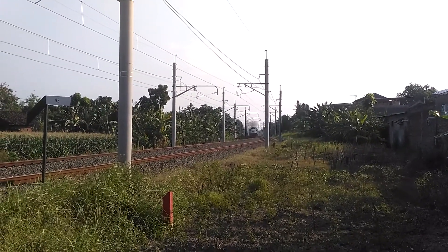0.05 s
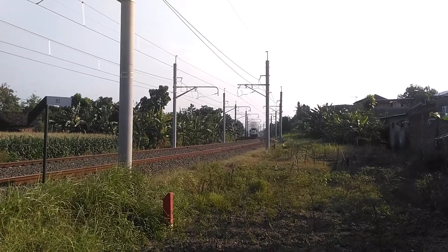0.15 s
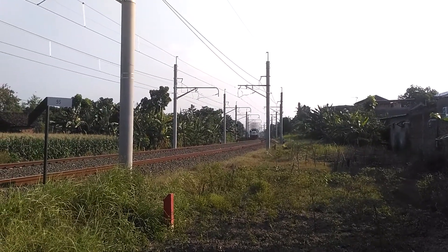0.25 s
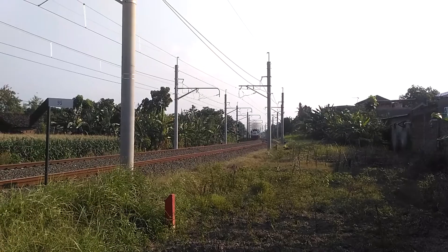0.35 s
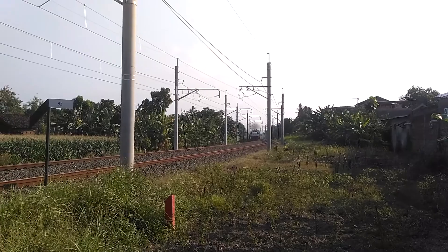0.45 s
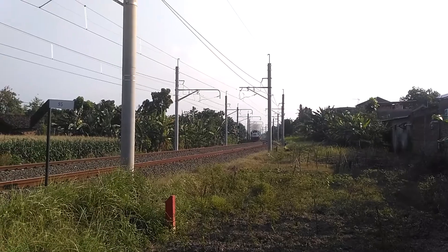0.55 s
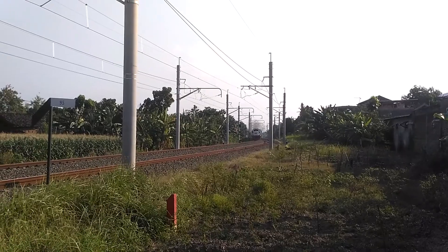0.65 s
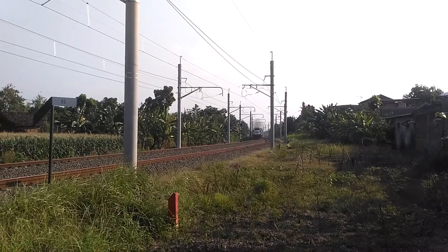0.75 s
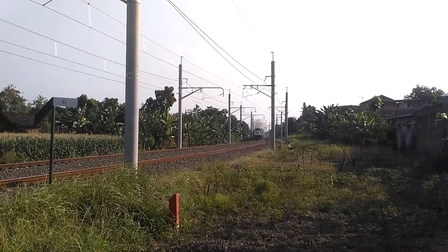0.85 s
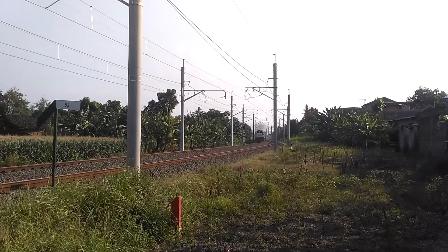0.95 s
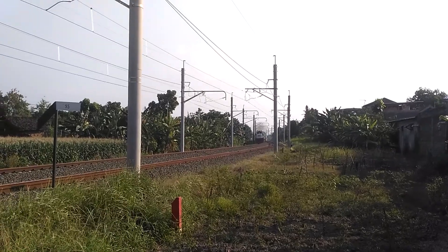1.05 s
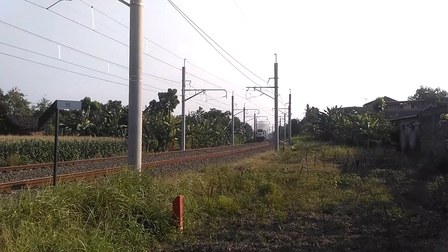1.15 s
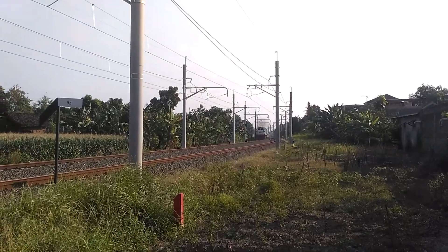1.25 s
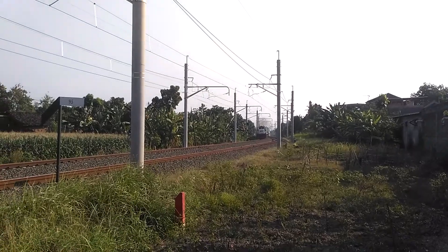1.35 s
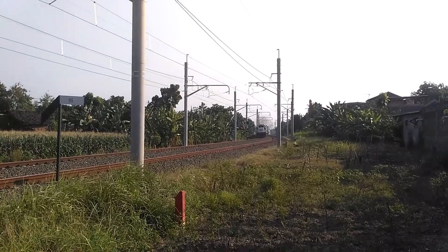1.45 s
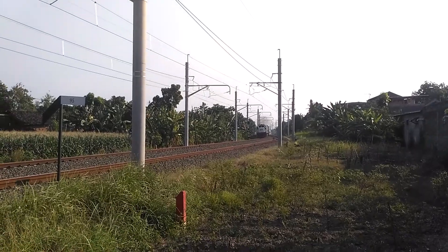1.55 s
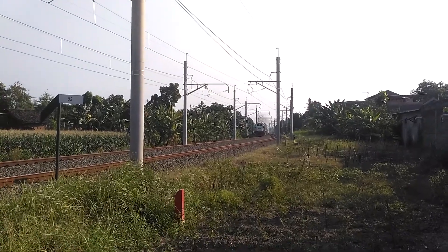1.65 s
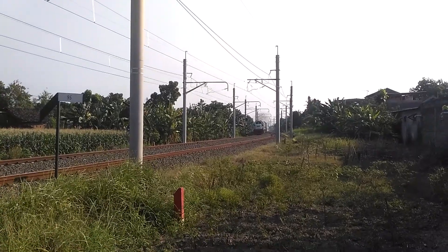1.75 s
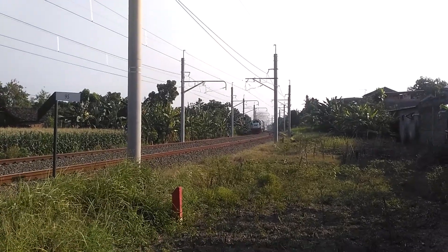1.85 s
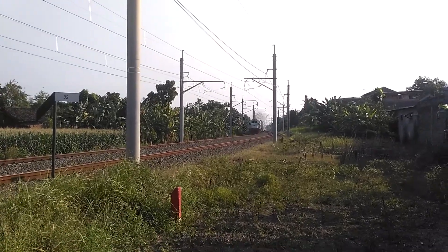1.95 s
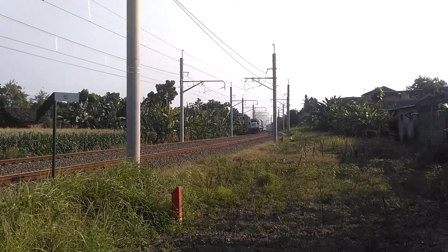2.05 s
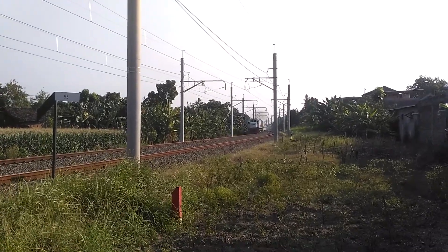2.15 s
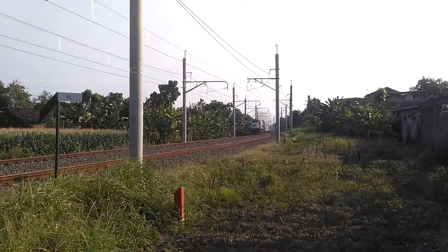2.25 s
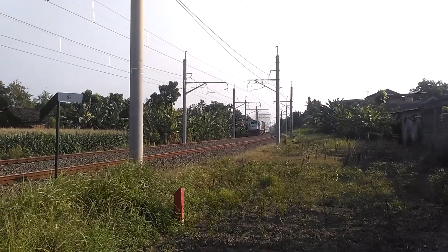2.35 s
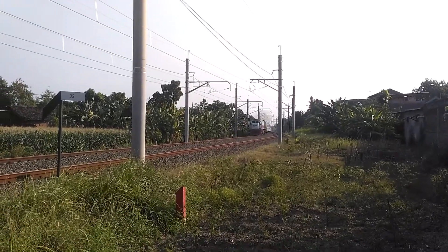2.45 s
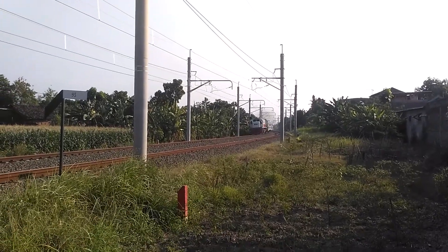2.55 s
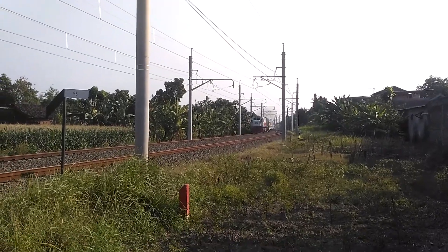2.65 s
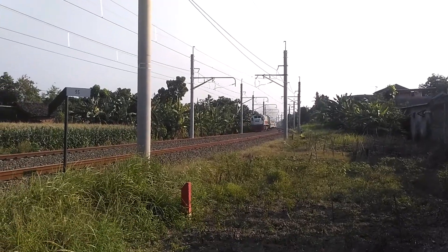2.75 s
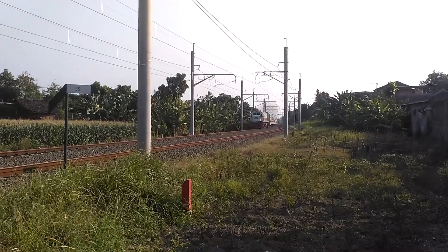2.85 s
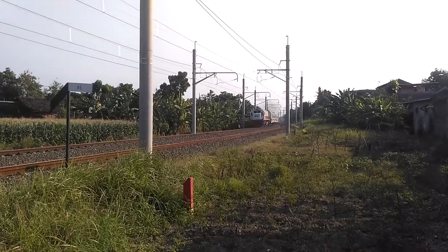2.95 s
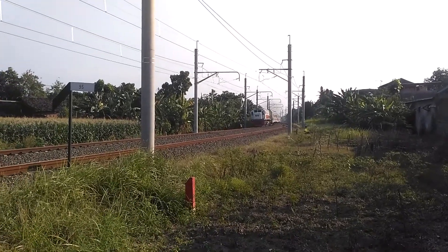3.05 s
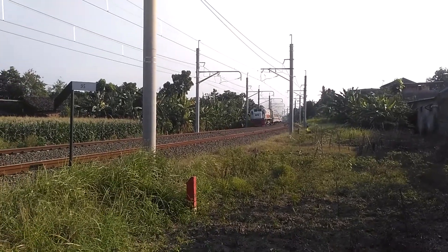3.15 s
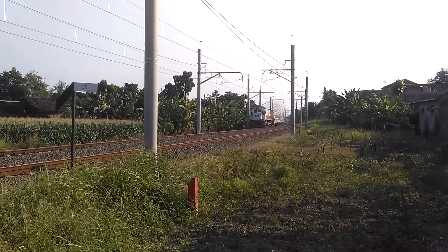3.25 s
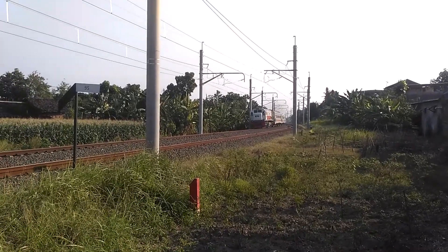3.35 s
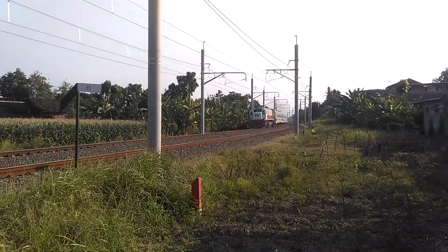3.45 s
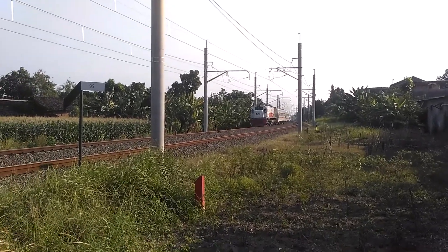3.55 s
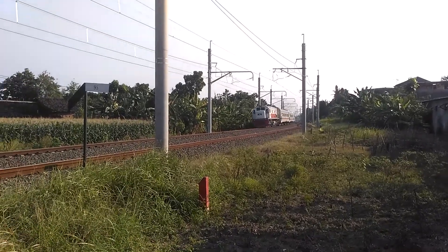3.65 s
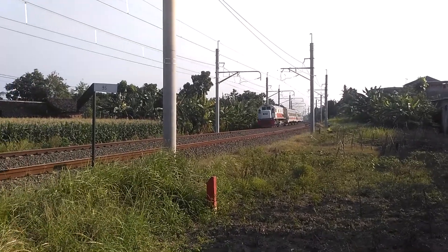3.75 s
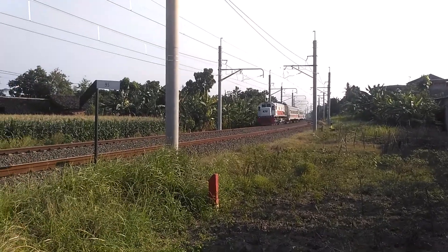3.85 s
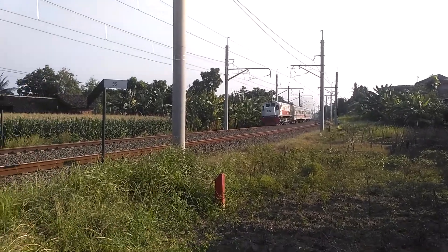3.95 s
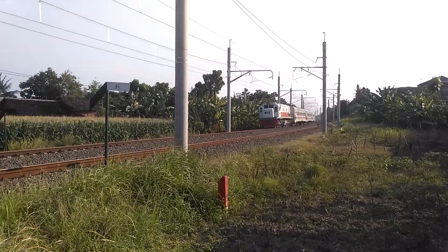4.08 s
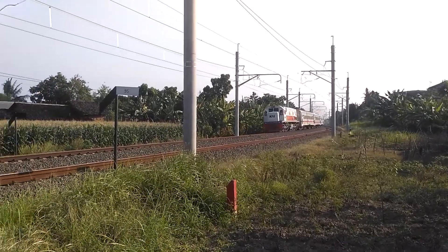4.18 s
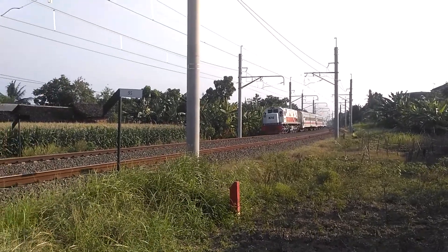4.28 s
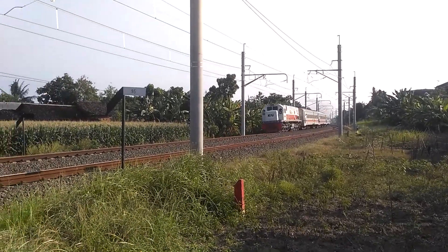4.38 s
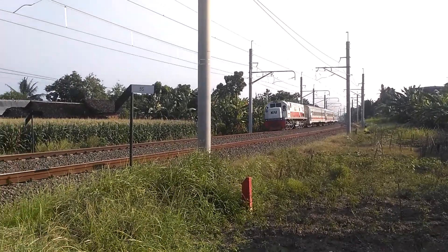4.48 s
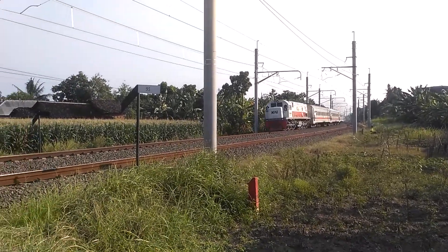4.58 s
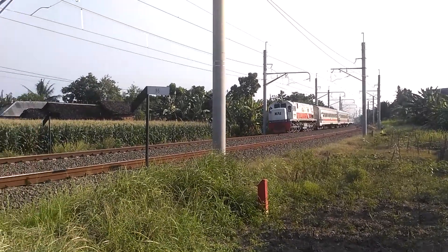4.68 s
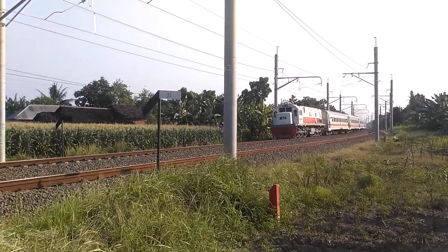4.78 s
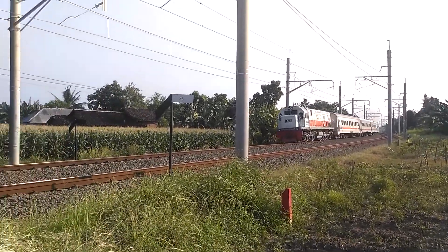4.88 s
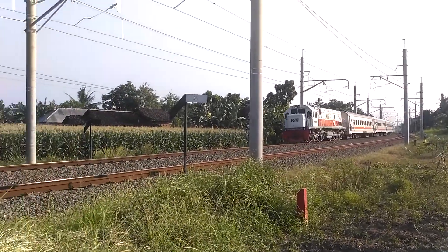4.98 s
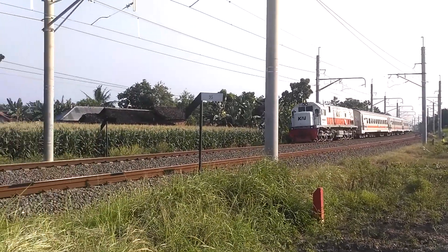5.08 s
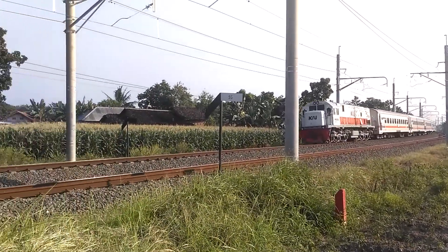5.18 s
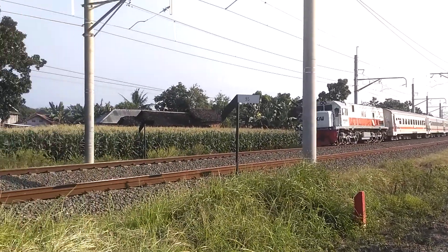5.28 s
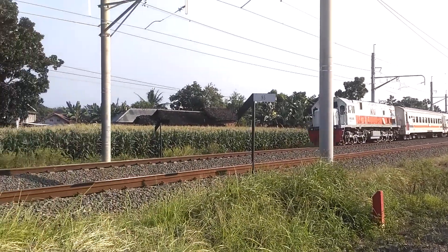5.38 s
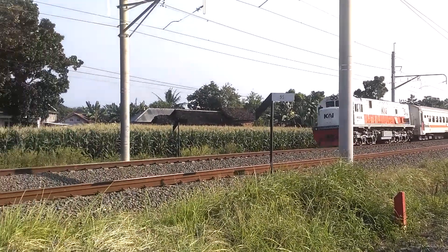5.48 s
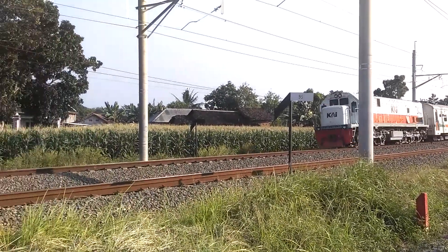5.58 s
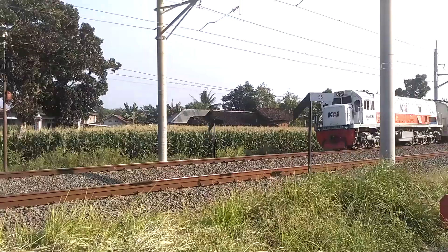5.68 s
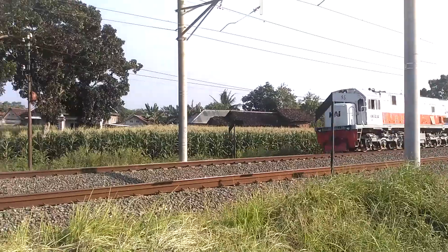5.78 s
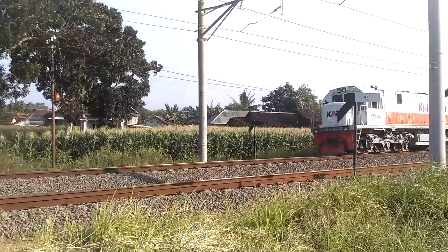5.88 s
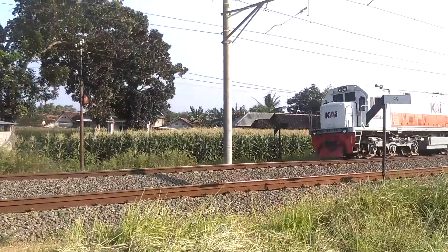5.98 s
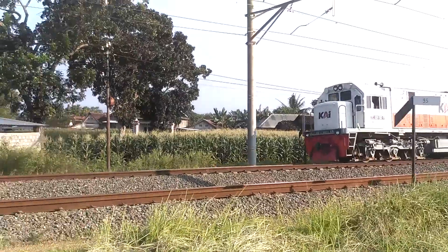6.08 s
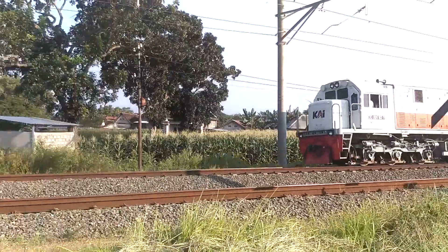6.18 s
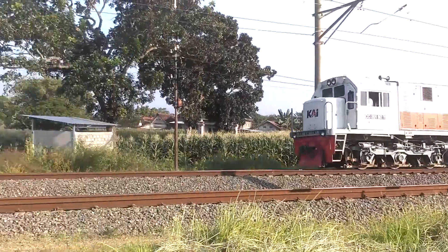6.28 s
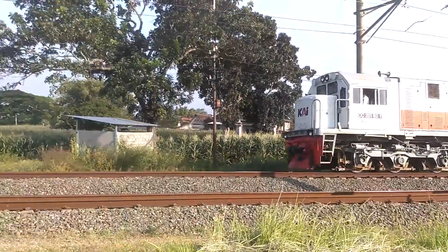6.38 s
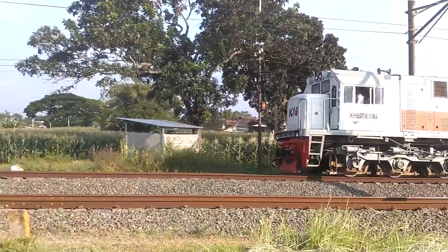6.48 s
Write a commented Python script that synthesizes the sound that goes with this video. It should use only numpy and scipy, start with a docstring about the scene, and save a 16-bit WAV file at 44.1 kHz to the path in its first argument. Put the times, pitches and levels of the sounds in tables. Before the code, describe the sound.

A diesel locomotive rumbles nearer along an open railway line, gives one long brassy horn blast, then throbs heavily with whining wheels as it draws close.

```python
"""Diesel locomotive with a horn blast

A diesel locomotive approaches through fields: a comb of exhaust orders throbs over banded rolling noise.
Close by, one harmonic horn blast sinks in pitch by the Doppler effect, with an echo from beside the track.
Early on, puffs of wind thump the left microphone port over a low breeze and knocks run ahead along the
rails; a wheel whine grows and is loudest shortly before the engine draws level.
An automatic gain control turns the level down under the horn."""
import sys
import numpy as np
from scipy import signal
from scipy.fft import rfft, irfft, next_fast_len
from scipy.io import wavfile
from scipy.ndimage import uniform_filter1d, map_coordinates

SR = 44100
rng = np.random.default_rng(int(sys.argv[2]) if len(sys.argv) > 2 else 0)


def digitize_waveform(pressure):
    """Quantize a signal to 16-bit integers and store it at the path in sys.argv[1].

    Rows of a 2-D input are taken as channels; values are limited to [-1, 1].
    """
    field = np.atleast_2d(pressure).T
    bounded = np.clip(field, -1, 1)
    quanta = np.round(bounded * 32767).astype(np.int16)
    wavfile.write(sys.argv[1], SR, quanta)


N = 287928
TIME = np.arange(N) / SR
LEFT_RIGHT = np.array([[1], [-1]])  # opposite signs for the two ports
HORN_ON_S, HORN_OFF_S = 4.712, 6.13
# horn partials 1 to 7, then all the treble: (nominal level at full blast [dB], trend [dB/s],
# release start [s], release rate [dB/s])
HORN_PARTIALS = [(-16, -0.5, 5.94, 171), (-6, -7, 5.705, 100.5), (-5, -8, 5.53, 61),
                 (-17.5, -19, 5.86, 101), (-16, -9.5, 5.77, 165.5), (-15, -6.5, 5.62, 86),
                 (-18.5, -12.5, 5.61, 78), (-16, -3, 5.573, 65)]


def from_db(db):
    """Amplitude gain from decibels, by the logarithmic law of level."""
    return 10 ** (np.asarray(db) / 20)


def rms_one(x):
    """Normalise the mean power, giving unit rms."""
    return x / np.sqrt(np.mean(x ** 2) + 1e-20)


def in_time(rows):
    """Linear interpolation of each column of a time curve at every sample."""
    s, *columns = np.transpose(rows)
    return [np.interp(TIME, s, c) for c in columns]


def at_hz(points, hz):
    """Linear interpolation of a spectrum on a log-frequency axis."""
    corner_hz, values = np.array(points).T
    return np.interp(np.log(hz), np.log(corner_hz), values)


def bumps(rows):
    """Gaussian level changes in dB, from rows of (time [s], half length [s], change [dB])."""
    return sum(db * np.exp(-((TIME - s) / half_s) ** 2) for s, half_s, db in rows)


def drift(rate_hz):
    """Random modulation: noise through a double-pole low-pass at a given rate, with spread about 1."""
    step = 40  # samples between the drawn points
    pole = np.exp(-2 * np.pi * rate_hz * step / SR)
    white = rng.standard_normal(N // step + 2002)
    slow = signal.lfilter([1], [1, -2 * pole, pole * pole], white)[2000:]
    return np.interp(np.arange(N) / step, np.arange(len(slow)), rms_one(slow))


def band(x, low_hz, high_hz, order=2):
    """Butterworth band-pass, maximally flat between its edges."""
    sos = signal.butter(order, [low_hz, high_hz], "band", fs=SR, output="sos")
    return signal.sosfilt(sos, x + 1e-18)


def diffuse(spectrum, low_hz, high_hz):
    """Diffuse-field noise: random phases, frequency-dependent port correlation; its middle has rms 1."""
    # correlation between the ports: (frequency [Hz], correlation coefficient)
    likeness = [(50, .6), (130, .9), (300, .7), (620, .62), (1300, .2), (2500, .05), (9000, 0)]
    size = next_fast_len(N, True)
    hz = np.fft.rfftfreq(size, 1 / SR)
    inside = (hz >= low_hz) & (hz < high_hz)
    mid, side = np.exp(2j * np.pi * rng.random((2, inside.sum())))
    alike = np.clip(at_hz(likeness, hz[inside]), -.9, 1)
    pair = np.sqrt(1 + alike) * mid + np.sqrt(1 - alike) * side * LEFT_RIGHT
    bins = np.zeros((2, len(hz)), complex)
    bins[:, inside] = from_db(at_hz(spectrum, hz[inside])) * pair
    x = irfft(bins, size)[:, :N]
    return x / x.mean(axis=0).std()


def breeze():
    """Turbulent pressure: lumpy low-frequency noise of moving air, slightly stronger on the left port."""
    # breeze level: (time [s], level [dB])
    breeze_curve = [(0, -51), (1.1, -48), (1.35, -56), (1.7, -50), (1.82, -42), (2.0, -53), (2.7, -58),
                    (4.2, -66), (5.0, -61)]
    rumble = rms_one(band(rng.standard_normal((2, N)), 55, 115)) * from_db(1.7 * drift(3))
    right_db = -1.5
    return rumble * from_db(in_time(breeze_curve)[0] + np.array([[0], [right_db]]))


def wind():
    """Eddy impact: each puff thumps the left port as a damped sinusoid and leaves a short noise flutter."""
    # wind puffs: (time [s], level before the common trim [dB], thump pitch [Hz])
    puffs = [(0.151, -31, 313), (0.169, -25, 173), (0.206, -30.5, 229), (0.263, -28.5, 234),
             (0.296, -26.5, 231), (0.503, -30.5, 202), (0.558, -28.5, 232), (0.633, -25.5, 222),
             (0.651, -28.5, 214), (0.922, -26.5, 184), (0.985, -33.5, 167), (1.171, -31, 347),
             (1.294, -32.5, 170), (1.454, -32, 181), (1.504, -30.5, 245), (1.531, -32, 172),
             (1.572, -27.5, 230), (1.587, -29, 172), (1.63, -23.5, 187), (1.673, -23, 186), (1.7, -28, 172),
             (1.766, -24.5, 168), (1.832, -26.5, 178), (2.26, -31.5, 310), (3.597, -28, 447)]
    trim_db, right_db = -4.5, -24
    rise_s, decay_s = 0.0024, 0.022
    push = np.zeros(N)
    age = np.arange(SR // 8) / SR
    for s, db, hz in puffs:
        thump = age / rise_s * np.exp(1 - age / rise_s) * np.sin(2 * np.pi * hz * age)
        envelope = np.exp(-age / decay_s) * (1 - np.exp(-age / rise_s))
        flutter = rms_one(band(rng.standard_normal(len(age)), 110, 400)) * envelope
        at = int(s * SR)
        push[at:at + len(age)] += from_db(db + trim_db) * (3.14 * thump + flutter)
    return push * from_db([[0], [right_db]])


def rail_knocks():
    """Structure-borne sound: hard wheel blows run far ahead in the rails as bursts in three resonances."""
    # resonances of the rail: (centre [Hz], width [Hz])
    rail_modes = [(1100, 160), (2350, 540), (4900, 700)]
    # wheel blows: (time [s], level in the first, second and third resonance [dB])
    knocks = [(.066, -41.5, -59, -42), (.093, -44, -58, -47), (.123, -45, -75, -50),
              (.183, -41.5, -61, -50), (.213, -41, -42, -49), (.243, -53, -43, -47.5),
              (.271, -44, -46, -46.5), (.301, -44, -43, -47), (.358, -43, -46, -62), (.381, -45, -62, -65),
              (.422, -45, -53, -52), (.449, -53, -38, -51), (.480, -57, -34, -54), (0.536, -57, -40, -71),
              (.595, -47, -36.5, -59), (0.655, -63, -41.5, -66), (0.707, -57, -41, -68)]
    half_s = .005
    out = 0
    for column, (hz, width_hz) in enumerate(rail_modes, 1):
        bursts = sum(from_db(row[column]) * np.exp(-((TIME - row[0]) / half_s) ** 2) for row in knocks)
        noise = band(rng.standard_normal((2, N)), hz - width_hz / 2, hz + width_hz / 2, order=3)
        out = out + bursts * rms_one(noise)
    return out


def sleeper_bursts():
    """Periodic excitation: one burst per sleeper the wheels cross, every other one stronger; rms 1."""
    crossing_hz, crossing_s = 34.02, .063
    sleeper = 2 * np.pi * crossing_hz * (TIME - crossing_s)
    return rms_one(np.exp(1.2 * np.cos(sleeper)) * (1 + .25 * np.cos(sleeper / 2)))


def wheel_ring():
    """Modal resonance: rolling contact keeps one wheel mode ringing, a whine pulsing with the sleepers."""
    # level of the ringing mode: (time [s], level [dB])
    ring_curve = [(0, -75), (2.2, -56), (3.6, -51), (4.7, -47), (5.6, -40), (5.82, -35), (6.05, -31),
                  (6.3, -32.5), (6.53, -34)]
    # moments when the wheel sings out: (time [s], half length [s], change [dB])
    ring_flares = [(5.994, .013, 7), (6.157, .012, 8), (6.43, .014, 4)]
    ring_hz, width_hz, waver, pulsing = 2200, 85, .007, .6
    low_pass = signal.butter(2, width_hz / 2, fs=SR, output="sos")
    # two slow noises in quadrature make a narrow band about the carrier
    shake = signal.sosfilt(low_pass, rng.standard_normal((2, 2, N)))
    phase = 2 * np.pi * np.cumsum(ring_hz * (1 + waver * drift(12.25))) / SR
    whine = shake[0] * np.cos(phase) + shake[1] * np.sin(phase)
    pulse = 1 - pulsing + pulsing * sleeper_bursts()
    return rms_one(pulse * whine) * from_db(in_time(ring_curve)[0] + bumps(ring_flares))


def nearness():
    """Straight-line geometry: how many times the distance has halved since the reference distance."""
    speed_m_per_s, level_at_s, track_m, reference_m = 26.46, 6.267, 19.85, 50
    return np.log2(reference_m / np.hypot(track_m, speed_m_per_s * (level_at_s - TIME)))


def surge_db(hz, t):
    """Spectro-temporal modulation: surges and lulls flat-topped in time and bell-shaped in log frequency."""
    # surges and lulls of the roar: (middle [s], length [s], centre [Hz], change [dB])
    surges = [(0.2, 0.33, 4640, 5.5), (0.263, 0.26, 1090, 3), (0.614, 0.43, 2320, 9), (1.176, 1, 5030, -7),
              (1.396, 0.99, 1630, -2.5), (1.98, 0.31, 1110, 7), (2.02, 0.69, 2650, 7),
              (2.74, 0.15, 5200, 6.5), (2.845, 0.96, 284, -2.5), (3.25, 0.83, 4800, 3),
              (3.52, 0.37, 1700, 4.5), (4.6, 0.42, 5700, 3.5), (5.891, 0.15, 5400, 2.5),
              (6.107, 0.23, 604, -6), (6.35, 0.4, 328, -3)]
    octaves = 0.66
    change = 0
    for s, length, centre, db in surges:
        bell = np.exp(-(np.log2(hz / centre) / octaves) ** 2 / 2)
        change = change + db * bell / (1 + (2 * (t - s) / length) ** 8)
    return change


def patchy(x, depth_db):
    """Short-time spectral modulation: narrow regions swell and fade, more evenly close by, under the surges."""
    size = 1024
    hz, s, frames = signal.stft(x, SR, nperseg=size)
    field = rng.standard_normal(frames.shape[1:])
    field = uniform_filter1d(uniform_filter1d(field, size=4, axis=0), size=3, axis=1)
    unevenness = np.interp(s, [2.0, 2.8, 4.5, 5.8], [.8, .6, .4, .3])
    gain = from_db(depth_db * unevenness * rms_one(field))
    gain = gain / np.sqrt(np.mean(gain ** 2, axis=0))
    gain = gain * from_db(surge_db(np.maximum(hz, 1)[:, None], s))
    return signal.istft(frames * gain, nperseg=size)[1][:, :N]


def roar(angle):
    """Rolling and machine noise: bands grow with nearness, chuff with firings and pulse with sleepers."""
    # edges of the four bands: body, wheels, rails, hiss [Hz]
    edges_hz = [40, 850, 1800, 3100, 14000]
    # the four bands: (level at the reference distance [dB], gain per halving of distance [dB])
    roar_bands = [(-32.5, 9), (-43.5, 7), (-46.5, 7), (-47.5, 8.5)]
    # colour far off, nearer and alongside: (frequency [Hz], relative spectral level [dB])
    far = [(40, -1), (130, 19.5), (250, 11.5), (420, -3), (660, 5.5), (830, -4), (1080, 1), (1700, -3),
           (2300, -2), (2750, -3), (3150, -31), (5000, -24.5), (6000, -31), (7300, -67)]
    nearer = [(40, 1.5), (130, 20), (280, 4.5), (450, 1), (680, 9.5), (830, -3.5), (1100, -2), (1750, -8.5),
              (2200, -9.5), (2900, -18), (3900, -16.5), (5200, -13), (6100, -21), (7400, -58.5)]
    alongside = [(40, -13.5), (80, 7), (160, 12.5), (330, 5), (600, 9), (900, -3), (1200, -1),
                 (1400, -10.5), (1950, -1), (2200, -3.5), (2500, -6), (3600, -6), (5600, -4.5),
                 (6600, -15.5), (9000, -50)]
    # pulsing as wheels cross the sleepers: (time [s], depth [0-1])
    sleeper_depth = [(0, 0.28), (1.0, 0.2), (4.5, 0.11), (6.53, 0.26)]
    chuff, uneven_db, flutter_db = 0.13, 3.0, .7
    near, close = np.clip((TIME - 1.4) / 0.67, 0, 1), np.clip((TIME - 4.9) / 0.92, 0, 1)
    shares = np.sqrt([1 - near, near * (1 - close), close])  # equal-power crossfade
    firing = 1 + chuff * (np.cos(4 * angle) + np.cos(5 * angle))
    burst = sleeper_bursts()
    depth = np.clip(in_time(sleeper_depth)[0], 0, 1)
    # the body band follows the firings, the other three the sleepers
    pulses = [firing] + [1 - depth + depth * burst * from_db(uneven_db * drift(39)) for _ in roar_bands[1:]]
    out, halvings = 0, nearness()
    for low, high, (db, growth_db), pulse in zip(edges_hz, edges_hz[1:], roar_bands, pulses):
        colours = zip(shares, [far, nearer, alongside])
        noise = sum(share * diffuse(colour, low, high) for share, colour in colours)
        out = out + noise * pulse * from_db(db + growth_db * halvings + flutter_db * drift(8.6))
    return patchy(out, depth_db=5.5)


def engine_angle():
    """Phase as the integral of rate: angle of the four-stroke cycle, zero on a throb."""
    # engine speed: (time [s], four-stroke cycles per second [Hz])
    speed = [(0, 9.0), (3.1, 9.06), (4.3, 9.13), (6.2, 9.17), (6.53, 9.1)]
    throb_s = 4.555
    turns = np.cumsum(in_time(speed)[0]) / SR
    return 2 * np.pi * (turns - np.interp(throb_s, TIME, turns))


def exhaust(angle):
    """Fourier series of a cycle: unequal cylinders give a comb of orders that throbs unevenly once a cycle."""
    # exhaust orders: (multiple of the cycle rate, relative level on approach [dB], alongside [dB])
    exhaust_orders = [(4, -30, -30), (7, -20, -25), (8, -23, -20), (10, -16, -20), (11, -15, -13),
                      (12, -3, -8), (13, -8, -8), (14, -9, -13), (15, -4, 1), (16, -9, -13), (17, 3, 2),
                      (18, -7, -8), (19, -18, -16), (20, -17, -15), (21, -7, -4), (24, -19, -14),
                      (25, -17, -12), (26, -18, -13), (29, -25, -16), (31, -25, -16)]
    # exhaust level: (time [s], level [dB])
    exhaust_curve = [(0, -42), (1.2, -48), (2.0, -48), (2.6, -40.5), (3.2, -36), (3.75, -39.5),
                     (4.05, -31.5), (4.4, -27.5), (4.6, -24.5), (4.95, -24), (5.35, -27.5), (5.68, -24),
                     (5.9, -30.5), (6.17, -16), (6.53, -15.5)]
    # swells and sags: (time [s], half length [s], change [dB])
    exhaust_swells = [(4.19, 0.017, 2.5), (4.32, .03, 1), (4.38, .02, -2.5), (4.5, 0.015, -10),
                      (4.55, 0.022, 3), (4.66, 0.016, 1.5), (4.72, 0.023, -5), (4.85, 0.025, -4.5),
                      (6.09, .015, 4), (6.2, 0.045, 1), (6.33, .035, -5), (6.39, .015, 0.5),
                      (6.465, .012, 2), (6.5, 0.021, 2.5)]
    smear_rad = 1.5  # spread of the orders' phases: the stack smears each beat
    alongside = np.clip((TIME - 4.8) / 0.6, 0, 1)
    out = 0
    for order, approach_db, alongside_db in exhaust_orders:
        db = approach_db + (alongside_db - approach_db) * alongside + 2 * drift(2.5)
        phase = order * angle + smear_rad * rng.standard_normal() + .6 * drift(1)
        out = out + from_db(db) * np.cos(phase)
    throb = 1 + (.35 - .2 * alongside) * np.cos(angle)
    level = from_db(in_time(exhaust_curve)[0] + bumps(exhaust_swells))
    return level * rms_one(out * throb * from_db(drift(6.4)))


def easing():
    """Linear ramp: how far the blast has eased, 0-1."""
    ease_on_s, ease_length_s = 5.4, 0.085
    return np.clip((TIME - ease_on_s) / ease_length_s, 0, 1)


def horn_levels():
    """Build-up and decay of partials in dB: higher ones speak later, then slope and release."""
    full_s, rise_s, rise_power = 5.0, .026, .53  # rise time grows as a power of the partial's number
    edge_loss_db = 9  # the brassy edge, partial 6 and up, drops quickly as the blast eases
    t = np.clip(TIME, HORN_ON_S, HORN_OFF_S)
    eased = easing()
    levels = []
    for k, (db, trend, release_s, fall) in enumerate(HORN_PARTIALS, 1):
        attack = -60 * np.exp((HORN_ON_S - t) / (rise_s * k ** rise_power))
        release = fall * np.maximum(t - release_s, 0) + edge_loss_db * eased * (k > 5)
        levels.append(db + attack + trend * (t - full_s) - release)
    return np.array(levels)


def reflections_db():
    """Interference: reflections briefly cancel or reinforce single partials, as level changes in dB."""
    # (time [s], partial number with 8 for all the treble, half length [s], change [dB])
    interference = [(4.778, 1, 0.027, 1.5), (4.784, 2, 0.012, 5), (4.817, 3, 0.024, -1),
                    (4.823, 2, 0.042, -16.5), (4.829, 6, 0.014, 4), (4.842, 1, 0.041, -14),
                    (4.855, 5, 0.017, 0.5), (4.865, 4, 0.034, -16), (4.901, 2, 0.017, -10.5),
                    (4.92, 8, 0.03, -4.5), (5.014, 4, 0.06, 4), (5.064, 6, 0.026, 6), (5.066, 8, 0.03, -2),
                    (5.01, 1, 0.062, -28), (5.069, 2, 0.06, -16.5), (5.102, 7, 0.026, 9.5),
                    (5.108, 6, 0.0063, -15), (5.109, 5, 0.037, -0.5), (5.214, 3, 0.026, 7.5),
                    (5.245, 2, 0.042, -14.5), (5.282, 3, 0.08, -9.5), (5.346, 2, 0.048, -4),
                    (5.332, 8, 0.1, -2.5), (5.356, 1, 0.048, -13), (5.369, 6, 0.034, 0),
                    (5.372, 7, 0.014, 5), (5.396, 2, 0.014, -17.5), (5.413, 3, 0.03, -5.5),
                    (5.434, 5, 0.095, -9.5), (5.668, 3, 0.007, -23), (5.686, 5, 0.036, 7),
                    (5.754, 2, 0.038, -11), (5.821, 2, 0.046, 8.5), (5.825, 1, 0.025, -24.5),
                    (5.894, 2, 0.016, 1)]
    change = np.zeros((len(HORN_PARTIALS), N))
    for s, partial, half_s, db in interference:
        change[int(round(partial)) - 1] += bumps([(s, half_s, db)])
    return change


def scatter(size, rate_hz):
    """Multipath fading: complex strength of shifting reflections at each port, with rms about 1."""
    step = 100  # samples between the drawn points
    pole = np.exp(-2 * np.pi * rate_hz * step / SR)
    steps = size // step + 402
    white = rng.standard_normal((2, steps)) + 1j * rng.standard_normal((2, steps))
    slow = signal.lfilter([1], [1, -2 * pole, pole * pole], white)[:, 400:]
    return np.array([np.interp(np.arange(size) / step, np.arange(len(z)), z / z.std()) for z in slow])


def horn_tone(pitch, levels, port_lag_s, port_fade_db, jitter, broken):
    """Harmonic series of a diaphragm; upper partials break up as reflections shift, apart at each port."""
    # treble partials: (frequency [Hz], relative level [dB])
    horn_top = [(2730, -3), (3080, -5), (3420, -7), (3800, -11), (4450, -8), (5300, -7), (6200, -16),
                (7500, -24), (9500, -39), (14000, -42)]
    tilt_db_per_octave = 6  # as the blast eases the highest partials go first
    scatter_share, scatter_hz, scatter_hz_per_partial = .85, 7, .65
    on = (TIME > 4.7) & (TIME < 6.15)
    phase = 2 * np.pi * np.cumsum(pitch * (1 + jitter * drift(45)))[on] / SR
    mean_hz = pitch[on].mean()
    partials = np.arange(1, 42)
    top = from_db(at_hz(horn_top, partials[7:] * mean_hz))
    top = 1.2 * top / np.linalg.norm(top)
    *heights, treble = [from_db(db[on]) for db in levels]
    tilt_db = tilt_db_per_octave * easing()[on]
    heights += [g * treble * from_db(-tilt_db * np.log2(k / 9)) for k, g in zip(partials[7:], top)]
    out = np.zeros((2, N))
    for k, height in zip(partials, heights):
        # the direct sound mixes with reflections, more strongly and quickly for higher partials
        share = max(broken, scatter_share * np.clip((k - 3) / 5.5, 0, 1))
        reflected = scatter(len(phase), scatter_hz + scatter_hz_per_partial * k)
        paths = np.sqrt(1 - share) + np.sqrt(share) * reflected
        sway = from_db(port_fade_db * drift(4)[on] * LEFT_RIGHT) if k < 4 else 1
        lead = np.clip(np.pi * k * mean_hz * port_lag_s, 0, .8) * LEFT_RIGHT  # radians
        wave = np.exp(1j * (k * phase + rng.uniform(0, 2 * np.pi))) * np.exp(1j * lead)
        out[:, on] += np.sqrt(2) * height * sway * (paths * wave).real
    return out


def horn():
    """Doppler effect and reflection: the air horn, its lower echo, scattered haze and rushing air."""
    # pitch as heard: (time [s], fundamental [Hz])
    horn_pitch = [(4.72, 345.5), (4.8, 345.7), (4.95, 342.6), (5.1, 341.9), (5.3, 340.7), (5.5, 339.6),
                  (5.7, 338.2), (5.85, 336.8), (6.1, 333)]
    # the echo drops in pitch as the horn runs past the reflector:
    # (time [s], fundamental [Hz], level against the direct sound [dB])
    horn_echo = [(4.72, 343, -25), (4.85, 335, -12), (4.95, 324, -8), (5.04, 312, -8.5), (5.17, 308, -8.5),
                 (5.3, 306, -13), (5.42, 305, -9), (5.48, 304, -17), (5.56, 304, -11), (5.7, 303, -20),
                 (6.1, 302, -28)]
    # the echo dulls on the way: (time [s], loss of its third and higher partials [dB])
    echo_dull = [(5.17, 1), (5.26, 13), (5.37, 7), (5.47, 16)]
    sway_db = 1.4
    haze_db, air_db = -15, -6.5  # against the upper partials and against the treble
    levels = horn_levels()
    upper = (np.arange(len(levels)) > 1)[:, None]
    valve = np.clip((TIME - HORN_ON_S) / 0.14, 0, 1) * np.clip((HORN_OFF_S - TIME) / 0.077, 0, 1)
    direct = horn_tone(in_time(horn_pitch)[0], levels + reflections_db(),
                       port_lag_s=.00014, port_fade_db=sway_db, jitter=.0007, broken=.015)
    # the echo comes from the right and is broken up by the uneven reflector
    echo_hz, echo_db = in_time(horn_echo)
    echo_tone = horn_tone(echo_hz, levels - in_time(echo_dull)[0] * upper,
                          port_lag_s=.00025, port_fade_db=sway_db, jitter=.006, broken=.35)
    echo = from_db(echo_db) * echo_tone[::-1]  # ports exchanged
    scattered = diffuse([(300, 1.3), (550, 5.5), (1100, 5.1), (1800, 3.5), (2600, 1.4)], 300, 2600)
    haze = from_db(haze_db) * np.linalg.norm(from_db(levels[2:]), axis=0) * scattered
    hiss_colour = [(2600, -1.5), (3800, -2.0), (5400, -7.5), (6500, -9.0), (9000, -26.5), (14000, -59)]
    air = from_db(levels[-1] + air_db) * diffuse(hiss_colour, 2600, 13000)
    return valve * (direct + echo + haze + air)


def arrive(x):
    """Time difference of arrival: sound from the left reaches the right port a little later."""
    # lead of the left port, growing as the engine draws level: (time [s], lead [s])
    port_lead = [(0, .00003), (4.3, .00004), (5.5, .0001), (6.1, .00024), (6.53, .00027)]
    late = np.arange(N) - in_time(port_lead)[0] * SR
    return np.array([x[0], map_coordinates(x[1], [late], order=3, mode="nearest")])


def ports(x, share):
    """Linear filtering: the two microphone ports colour sound differently, by a share of their balance."""
    # balance of the ports at full share: (frequency [Hz], left minus right [dB])
    port_balance = [(100, 1.8), (340, 3.7), (650, 1.2), (1050, 1.3), (1700, 0.3), (2200, 10.3), (2780, 7.2),
                    (3500, 0.54), (4400, 4.2), (5000, 18.4), (6000, 12), (9000, 16)]
    bins_hz = np.maximum(np.fft.rfftfreq(N, 1 / SR), 1)
    gains = from_db(share * at_hz(port_balance, bins_hz) * LEFT_RIGHT / 2)
    return irfft(rfft(x) * gains / gains.mean(axis=0), N)


def scene():
    """Superposition: the train's level leans left, then evens out as the microphone turns to follow it."""
    angle = engine_angle()
    left_db = np.interp(TIME, [4.2, 5.2], [3.5, 0.5])  # left minus right
    train = exhaust(angle) + roar(angle) + rail_knocks() + wheel_ring()
    train = train * from_db(left_db * LEFT_RIGHT / 2)
    return ports(arrive(train), share=0.99) + ports(horn(), share=0.66) + wind() + breeze()


def gain_control(x):
    """Peak-hold compression: power above a ceiling turns the gain down fast; it creeps back linearly in dB."""
    ceiling_db, recovery_db_per_s = -9, 11.5
    power = uniform_filter1d(np.mean(x ** 2, axis=0), size=SR // 25)
    excess = np.maximum(10 * np.log10(np.maximum(power, 1e-12)) - ceiling_db, 0)
    recovery = recovery_db_per_s * TIME
    held = np.maximum.accumulate(excess + recovery) - recovery
    return x * from_db(-uniform_filter1d(held, size=SR // 50))


def record(dry):
    """Gain control, short end fades, soft saturation of the loudest peaks and a steep low-pass."""
    fade = np.clip(np.minimum(TIME, TIME[-1] - TIME) / .006, 0, 1) ** 2
    x = gain_control(dry) * fade
    rounded = x / (1 + (x / .65) ** 4) ** (1 / 4)
    stop_hz = 14950  # 70 dB down from here up
    return signal.sosfilt(signal.cheby2(14, 70, stop_hz, fs=SR, output="sos"), rounded)


dry = scene()
out = record(dry)
digitize_waveform(out)
```